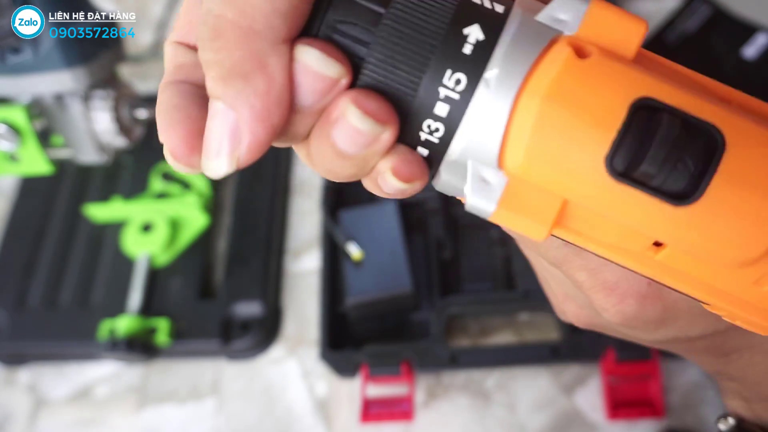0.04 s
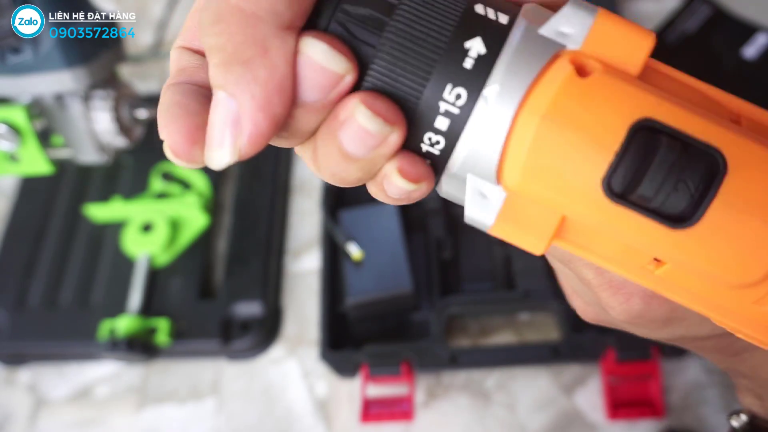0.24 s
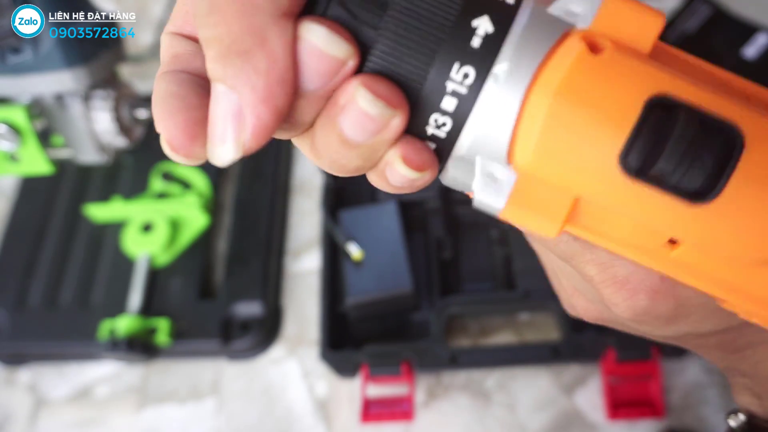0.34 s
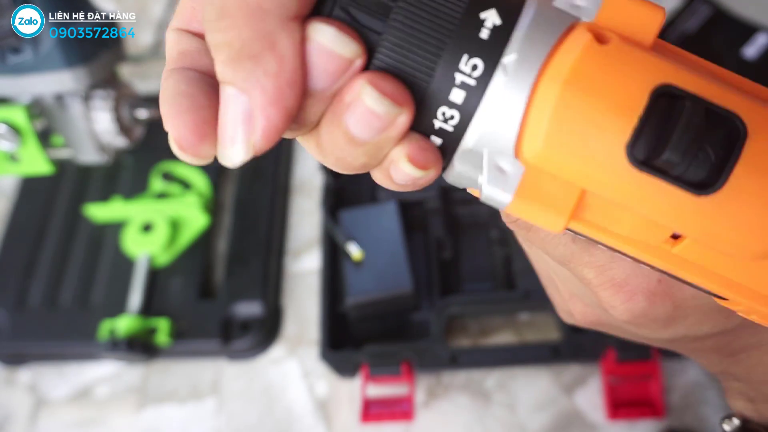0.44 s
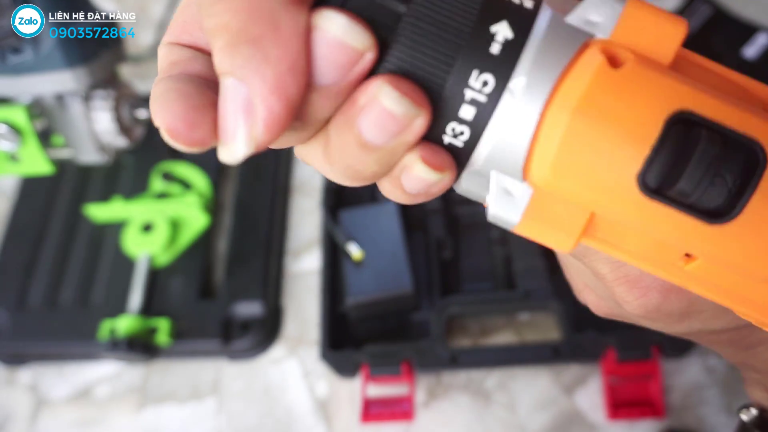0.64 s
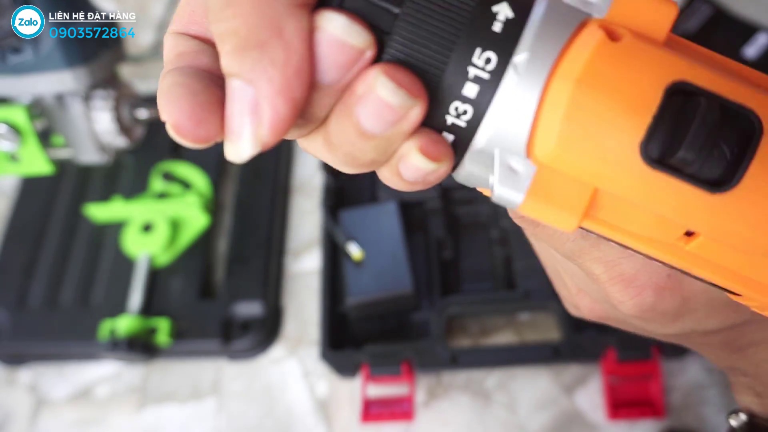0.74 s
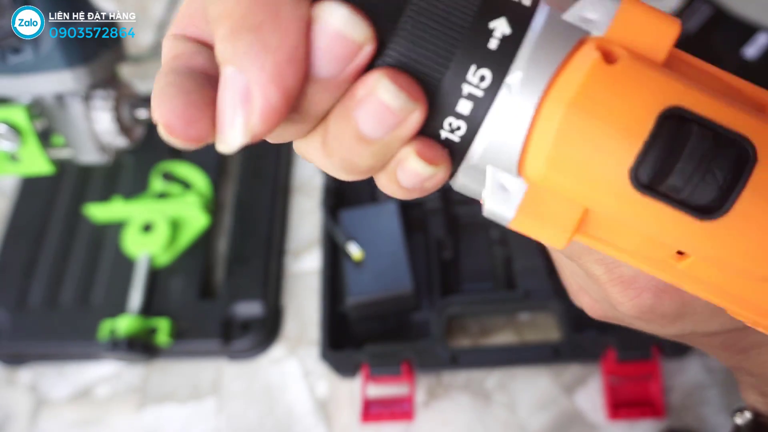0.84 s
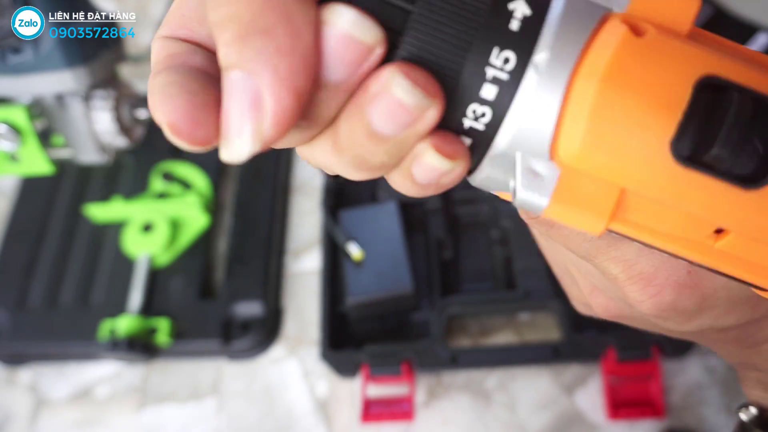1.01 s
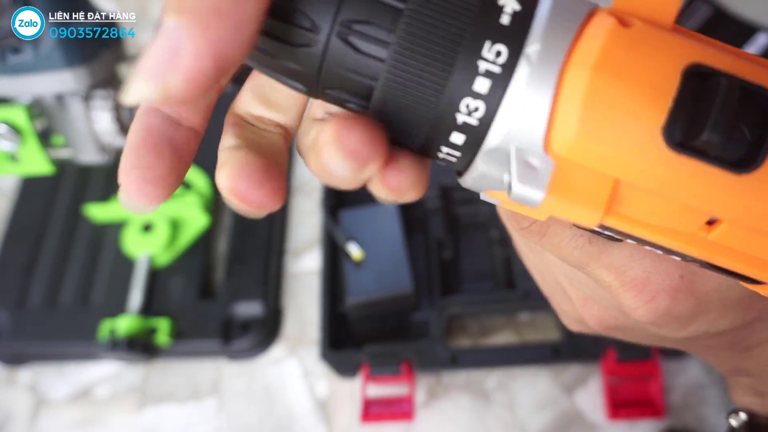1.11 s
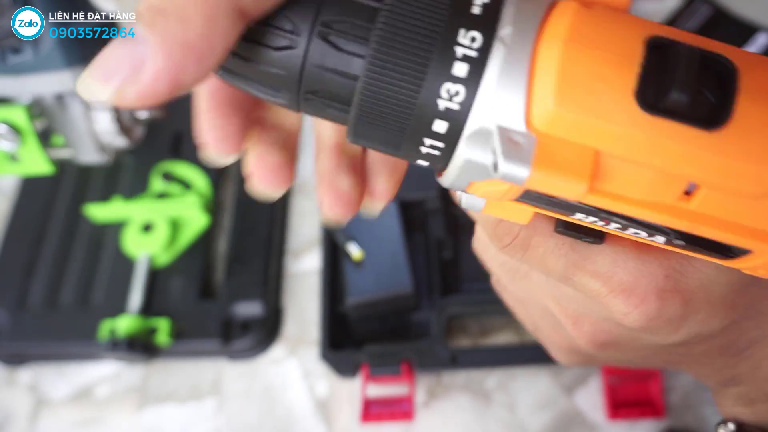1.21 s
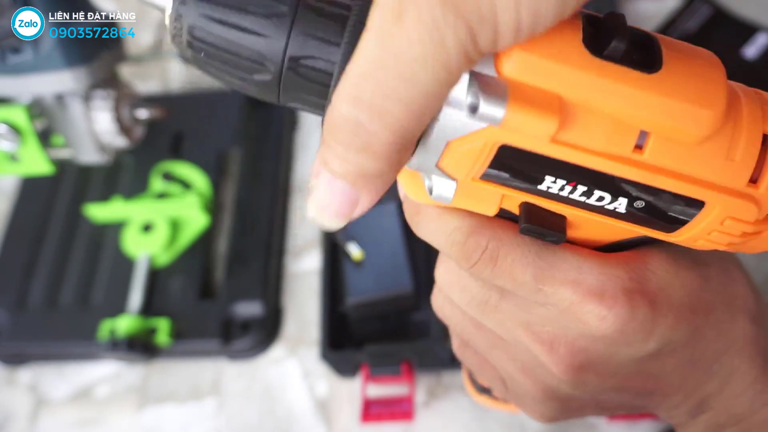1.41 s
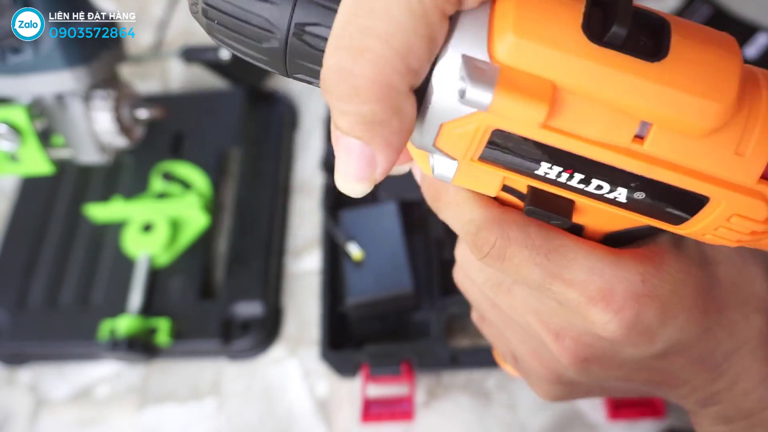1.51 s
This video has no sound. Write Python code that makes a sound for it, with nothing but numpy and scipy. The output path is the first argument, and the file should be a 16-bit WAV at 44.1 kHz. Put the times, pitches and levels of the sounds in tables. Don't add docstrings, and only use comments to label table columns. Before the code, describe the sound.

Cordless drill squeezed in short bursts, whining and ticking, with sharp clutch clicks close up indoors

```python
import sys
import numpy as np
from scipy import signal
from scipy.fft import rfft, irfft, next_fast_len
from scipy.io import wavfile
from scipy.ndimage import uniform_filter1d, map_coordinates

SR = 44100
rng = np.random.default_rng(int(sys.argv[2]) if len(sys.argv) > 2 else 0)


def nominal_scale(level):
    x = np.asarray(level, float) / 20
    return 10 ** x


def put_to_file(sound):
    columns = np.atleast_2d(sound).T
    safe = np.clip(columns, -1, 1)
    whole_steps = np.round(safe * 32767)
    wavfile.write(sys.argv[1], SR, whole_steps.astype(np.int16))


N = 68355

# frequency in Hz, level in dB per Hz.
AIR = [(25, -31), (130, -23), (330, -9.5), (570, -12.5), (1800, -21), (3000, -19), (4500, -25),
       (11300, -32)]
AIR_DB = -57.5
# centre in Hz, width in Hz, level in dB.
HUM = [(153.8, 8.6, -73.5), (393.7, 5.8, -62.5), (3000, 130, -70.5)]
# frequency in Hz, correlation.
ALIKE = [(60, 0.67), (300, 0.88), (840, 0.5), (3140, 0.11)]
# time in seconds, level in dB.
DUCK = [
    (0, 5.5),
    (.82, 5.5),
    (.95, 2),
    (1.3, -.5),
    (1.55, 2.5),
]
BASS_DUCKS = 1.73
# frequency in Hz, T60 in seconds.
ROOM = [(200, 0.52), (2000, 0.4), (10000, 0.24)]
ROOM_DB = -13.5

# frequency in Hz, left over right in dB.
DRILL_PAN = [(400, 1.5), (1420, -6.5), (4090, -7), (9000, -1)]
# frequency in Hz, scatter in rad.
SPREAD = [(500, 0.37), (3000, 0.59), (7000, 0.97)]
WHINE_PAN_DB, SNAP_PAN_DB = -7, 0.5

# time in seconds, level in dB.
SKIN_SLIDE = [
    (1.02, -64),
    (1.13, -68),
    (1.175, -68),
    (1.187, -60),
    (1.21, -67),
    (1.28, -70),
    (1.36, -82),
]
# frequency in Hz, level in dB per Hz.
SKIN = [(1200, -16), (2360, -4), (4060, -12.5), (10000, -11)]
# time in seconds, level in dB.
RUSTLE = [
    (1.22, -68),
    (1.28, -60),
    (1.295, -85),
    (1.41, -75),
    (1.42, -59.5),
    (1.45, -78),
    (1.5, -80),
    (1.515, -63.5),
    (1.55, -62),
]
# frequency in Hz, level in dB per Hz.
CLOTH = [(2500, -25), (5500, -3), (9000, 6), (11300, -6)]

# start in seconds, peak in dB, ring in Hz.
SNAPS = [(0.0205, -43, 9350), (0.04, -38, 7550), (0.0542, -30.5, 7900), (0.066, -42, 5500),
         (0.2176, -19, 6260), (0.3087, -31, 10600), (0.3187, -16.5, 4450), (0.3467, -27, 10000),
         (0.402, -43, 4440), (0.4326, -38, 8400), (.5335, -35, 7800), (0.6208, -29, 5300),
         (.627, -28, 10000), (0.6396, -16.5, 5520), (0.8722, -15.5, 10500), (1.0711, -36, 5980),
         (1.0928, -33.5, 4220), (1.1364, -44, 7700), (1.153, -38, 2450), (1.1602, -36.5, 9700),
         (1.166, -44, 9400), (1.184, -37.5, 2300), (1.1887, -38, 2110), (1.199, -41, 1980),
         (1.2064, -34.5, 10850), (1.5137, -48, 7400)]
# centre in Hz, width in Hz, level in dB.
SNAP_RING = [(4420, 4500, -7), (10140, 1500, -7)]
SNAP_T60, SNAP_DB = 0.0082, 3.5
SNAP_Q, SNAP_OWN_DB = 8, 4
SPIKE = 9

# time in seconds, level in dB.
EFFORT = [
    [(0, -47.5), (.012, -40.5), (.04, -45.5), (.06, -50), (.075, -61)],
    [(.196, -49.5), (.22, -37.5), (.27, -50.5), (.31, -39.5), (.335, -51), (.385, -48), (.4, -38),
     (.44, -55)],
    [(.529, -43.5), (.6, -44), (.685, -34.5), (.7, -41), (.735, -42), (.765, -60)],
    [(.828, -42.5), (.86, -42.5), (.875, -32), (.94, -30.5), (.975, -31.5), (1.0, -47), (1.04, -63)],
]
# frequency in Hz, level in dB per Hz.
GEARS = [(250, -35), (480, -21), (750, -3.5), (2400, -6), (4000, -11), (11300, -17)]
GEAR_DB, GRIT_DB = 1.5, 3
HISS_DB, HISS_GROWS = 10.5, 1.414
COAST_HZ, COAST_WIDTH_HZ, COAST_DB = 3200, 220, -1.5

# start in seconds, peak in dB, loudest housing ring in Hz.
COGS_COAST = [
    (0.0103, -28.5, 1370),
    (0.0163, -33, 1422),
    (0.0215, -31, 815),
    (0.0274, -34, 1140),
    (0.0324, -34, 1260),
    (0.0363, -42, 1360),
    (0.0429, -41, 1230),
    (0.0523, -33.5, 1510),
]
COGS_1 = [(0.1967, -32, 1710), (0.211, -37, 1260), (0.2188, -14.5, 1930), (0.2225, -24, 700),
          (0.226, -30, 1250), (0.231, -22.5, 1280), (0.238, -27, 1640), (0.247, -25.5, 1210),
          (0.255, -30, 1350), (0.2685, -27, 1570), (0.2865, -39, 2390), (0.301, -27.5, 1480),
          (0.3123, -28.5, 1730), (0.3205, -29.5, 1380), (0.327, -30, 1440), (0.3471, -29.5, 2360),
          (0.3533, -23, 1390), (0.3826, -32, 1520), (0.393, -30, 1410), (0.3984, -25.5, 1550),
          (0.403, -29.5, 1590)]
COGS_2 = [(0.5294, -44, 2000), (0.5353, -21.5, 850), (0.5458, -30, 990), (0.5536, -26.5, 1320),
          (0.5645, -27, 1350), (0.573, -25.5, 1510), (0.5848, -29, 1680), (0.6004, -24.5, 1350),
          (0.6099, -23, 2440), (0.6232, -20, 2530), (0.6339, -21, 2040), (0.6449, -16.5, 2200),
          (0.6525, -19.5, 2326), (0.6595, -29, 1420), (0.6664, -22, 1490), (0.6722, -24, 1300),
          (0.6772, -21.5, 1840), (0.683, -17, 1700), (0.6874, -22, 2270), (0.6908, -26.5, 1050),
          (0.6958, -24.5, 2050), (0.7052, -24.5, 1290), (0.7152, -23, 1100), (0.7254, -26, 1290)]
COGS_RUN_UP = [(0.8291, -28.5, 1540), (0.8414, -38, 1440), (0.8447, -32.5, 1070), (0.848, -28, 1670),
               (0.8539, -24, 1360), (0.8569, -31, 1440), (0.8593, -27.5, 1466), (0.8625, -21, 1280),
               (0.867, -18, 1920), (0.8708, -17, 1590), (0.8746, -14.5, 2130), (0.8782, -18.5, 2480),
               (0.8815, -20.5, 1579), (0.8834, -16.5, 1900), (0.886, -24, 1840), (0.8883, -24, 1510),
               (0.8903, -17, 1540), (0.8933, -31, 1860), (0.8976, -23, 2050), (0.9003, -17.5, 1770),
               (0.9039, -17.5, 1540)]
# centre in Hz, width in Hz, level in dB.
COG_BODY = [(744, 370, -5.5), (1479, 284, 1.5), (2050, 740, -3.5), (3280, 460, 5.5), (4500, 470, -2.5)]
COG_DB, COG_TOP_HZ = 1.5, 5330
COG_VARY, COG_COLOUR_DB = 0.076, 2.5
COG_RING_DB, COG_RING_Q, RUN_TOP_DB = 6.5, 4.4, -3

# time in seconds, cog rate in Hz, level in dB.
SPIN = [
    (.87, 330.1, -19),
    (.885, 480.6, -19),
    (.9, 598.1, -18.5),
    (.91, 715.7, -21),
    (.922, 820.3, -22.5),
    (.935, 882.6, -22),
    (.955, 890.4, -27),
    (.97, 710.6, -24),
    (.99, 339, -37.5),
]
# multiple of the cog rate, level in dB over the cogs.
MESH = [(1, -16), (3, -3), (5, -7)]
# frequency in Hz, level in dB.
MESH_BODY = [(1100, -24), (1600, -9), (2150, -1), (2450, -4), (2700, -14), (3900, -14), (4400, -2)]
SCATTER, COG_SIZE_DB = .3, 3.5

# start in seconds, pitch in Hz, level in dB.
WHINE_1 = [(.197, 3167, -30.5), (.207, 3183, -32), (0.22, 3200, -38), (0.237, 3137, -29.5),
           (0.244, 3290, -35), (.262, 3290, -34), (0.2748, 3029, -28), (.291, 3311, -33), (.354, 3030, -33),
           (.361, 3254, -36.5), (0.372, 3144, -37), (.383, 3165, -60)]
WHINE_2 = [(.530, 3168, -32), (0.552, 3290, -30.5), (.561, 3100, -29), (.566, 3312, -32.5),
           (.578, 3025, -26.5), (.585, 3315, -31), (.606, 2952, -26), (.617, 2995, -27),
           (.625, 2960, -25.5), (0.633, 3215, -29.5), (0.651, 2968, -30), (.682, 3230, -33.5),
           (0.704, 3160, -44)]
WHINE_3 = [(0.829, 3160, -31.5), (0.8438, 3290, -38), (0.8486, 3114, -30.5), (.852, 3280, -36),
           (0.8569, 3120, -28), (0.861, 3236, -37), (.865, 3075, -28), (0.870, 3320, -30),
           (0.879, 2948, -25.5), (0.886, 3290, -42), (0.893, 3180, -27), (.898, 2990, -60)]
OVERTONES_DB = (0, -16, -17.5)
WHINE_DB, WHINE_WOBBLE_DB, WHINE_JITTER_HZ = 1, 1.39, 12
# frequency in Hz, level in dB.
THIRD_GAIN = [(8800, -8), (9400, 2.5), (10000, -2.5)]

TOP_HZ, EDGE_HZ = 11200, 110
SIDES = np.array([[.5], [-.5]])


def unit(x):
    return x / np.sqrt(np.mean(x ** 2) + 1e-20)


def along(points, hz):
    f, v = np.transpose(points)
    return np.interp(np.log(hz + 1), np.log(f + 1), v)


def curve(rows, column=1, out=-120):
    r = np.asarray(rows, float)
    return np.interp(np.arange(N) / SR, r[:, 0], r[:, column], out, out)


def wobble(rate):
    knots = rng.standard_normal(int(N * rate / SR) + 4)
    return map_coordinates(knots, [np.arange(N) * rate / SR])


def filtered(x, response):
    m = next_fast_len(N + SR // 2)
    return irfft(rfft(x, m) * response(np.fft.rfftfreq(m, 1 / SR)), m)[..., :N]


def resonances(peaks):
    def response(f):
        total = 0
        for k, (c, w, db) in enumerate(peaks):
            total = total + (-1) ** k * nominal_scale(db) * 1j * f * w / (c * c - f * f + 1j * f * w)
        return total
    return response


def noise(spectrum):
    return unit(filtered(rng.standard_normal(N), lambda hz: nominal_scale(along(spectrum, hz))))


def hum(centre, width):
    return unit(filtered(rng.standard_normal(N), lambda f: 1 / (1 + ((f - centre) / width) ** 2)))


def effort():
    return np.max([curve(rows) for rows in EFFORT], axis=0)


def air():
    def angle(hz):
        return np.arccos(np.clip(along(ALIKE, hz), -1, 1)) / 2

    def mid_side(hz):
        return nominal_scale(along(AIR, hz)) * [np.cos(angle(hz)), np.sin(angle(hz))]
    mid, side = filtered(rng.standard_normal((2, N)), mid_side)
    bed = nominal_scale(AIR_DB + 1.27 * wobble(6.73)) * unit(np.array([mid + side, mid - side]))
    low, *hums = (nominal_scale(db) * hum(c, w) for c, w, db in HUM)
    bass = filtered(bed + low, lambda hz: 1 / (1 + (hz / 236.0) ** 4))
    rest = filtered(bed, lambda hz: 1 / (1 + (255.0 / (hz + 1)) ** 4))
    duck = curve(DUCK)
    return nominal_scale(duck) * rest + sum(hums) + nominal_scale(BASS_DUCKS * duck - 2.5) * bass


def room(x):
    hz, t, z = signal.stft(rng.standard_normal((2, SR // 2)), SR, nperseg=256)
    decay = nominal_scale(-60 * t / along(ROOM, hz)[:, None])
    tail = signal.istft(z * decay, SR, nperseg=256)[1]
    delayed = np.pad(x, (250, 0))[None]
    return signal.fftconvolve(delayed, tail / np.linalg.norm(tail[0]), axes=1)[:, :N]


def ports(x):
    knots = rng.standard_normal(64)

    def response(hz):
        phase = along(SPREAD, hz) * map_coordinates(knots, [hz / 400])
        low_cut = hz ** 4 / (hz ** 4 + 234.0 ** 4)
        return nominal_scale(along(DRILL_PAN, hz) * SIDES) * low_cut * np.exp(2j * SIDES * phase)
    return filtered(x, response)


def fingers():
    rustle_db = curve(RUSTLE) + 3.4 * np.array([wobble(150), wobble(150)])
    rustle = nominal_scale(rustle_db) * np.array([noise(CLOTH), noise(CLOTH)])
    slide_db = curve(SKIN_SLIDE) + 11 + 4.3 * np.array([wobble(140), wobble(120)])
    return rustle + nominal_scale(slide_db) * np.array([noise(SKIN), noise(SKIN)])


def snaps():
    out, t = np.zeros((2, N + SR)), np.arange(1000) / SR
    envelope = nominal_scale(-60 * t / SNAP_T60) * (1 - np.exp(-t / 0.00033))
    for s, db, hz in SNAPS:
        crack = np.zeros((2, N))
        same, own = rng.standard_normal(len(t)), rng.standard_normal((2, len(t)))
        crack[:, :len(t)] = (same + 2.5 * own) * envelope
        crack[:, 12] += SPIKE
        rings = SNAP_RING[:1] + [(hz, hz / SNAP_Q, SNAP_OWN_DB)] + SNAP_RING[1:]
        crack = filtered(crack, resonances(rings))[:, :len(t)]
        crack /= np.abs(crack.mean(axis=0)).max()
        out[:, round((s + .0006) * SR):][:, :len(t)] += nominal_scale(db + SNAP_DB + SIDES * SNAP_PAN_DB) * crack
    return out[:, :N]


def coast():
    return nominal_scale(COAST_DB + curve(EFFORT[0]) + 5.7 * wobble(250)) * hum(COAST_HZ, COAST_WIDTH_HZ)


def gears():
    db = effort()
    top = db.max()
    low = filtered(noise(GEARS), lambda hz: 1 / (1 + (hz / 4000) ** 4))
    high = filtered(np.array([noise(GEARS), noise(GEARS)]), lambda hz: 1 / (1 + (4000 / (hz + 1)) ** 4))
    grit = nominal_scale(GEAR_DB + db + GRIT_DB * wobble(700)) * low
    hiss = nominal_scale(HISS_DB + top + HISS_GROWS * (db - top) + 2.36 * wobble(500)) * high
    return coast() + grit + hiss


def kick(body):
    def response(f):
        return resonances(body)(f) / (1 + 1j * f / COG_TOP_HZ) ** 2
    tap = filtered(np.eye(1, N)[0], response)[:800]
    return tap / np.abs(tap).max()


def slow_cogs():
    out = np.zeros(N + SR)
    for s, db, hz in [*COGS_COAST, *COGS_1, *COGS_2, *COGS_RUN_UP]:
        body = []
        for c, w, g in COG_BODY:
            centre = c * np.exp(COG_VARY * rng.standard_normal())
            body.append((centre, w, g + COG_COLOUR_DB * rng.standard_normal()))
        nearest = np.argmin([abs(np.log(c / hz)) for c, _, _ in body[:3]])
        body[nearest] = (hz, hz / COG_RING_Q, COG_RING_DB)
        out[round((s - .0003) * SR):][:800] += nominal_scale(db) * kick(body)
    return nominal_scale(COG_DB) * out[:N]


def whirr():
    rate = curve(SPIN, column=1, out=0)
    turn = np.cumsum(rate) / SR
    level = nominal_scale(curve(SPIN, column=2))
    uneven = turn + SCATTER * wobble(600).clip(-1.5, 1.5)
    at = np.flatnonzero(np.diff(np.floor(uneven)) > 0)
    at = at[at > (COGS_RUN_UP[-1][0] + .001) * SR]
    kicks = np.zeros(N)
    kicks[at] += level[at] * nominal_scale(COG_SIZE_DB * rng.standard_normal(N)[at])
    one = kick([(c, w, g + RUN_TOP_DB * (c > 3000)) for c, w, g in COG_BODY])
    mesh = np.zeros(N)
    for k, db in MESH:
        gain = nominal_scale(db + along(MESH_BODY, k * rate) + 4.2 * wobble(150))
        mesh += gain * np.sin(2 * np.pi * k * turn)
    return signal.fftconvolve(kicks, one)[:N] + level * mesh


def whine():
    hz, db = np.full(N, 3100.), np.full(N, -120.)
    for steps in (WHINE_1, WHINE_2, WHINE_3):
        for (s, f, level), (end, _, _) in zip(steps, steps[1:]):
            step = slice(round(s * SR), round(end * SR))
            hz[step], db[step] = f, level
    pitch = uniform_filter1d(hz, size=20) + WHINE_JITTER_HZ * wobble(500)
    phase = 2 * np.pi * np.cumsum(pitch) / SR
    gain = uniform_filter1d(nominal_scale(db + WHINE_DB), size=40) * np.sqrt(2)
    shake = np.clip((effort() + 48) / 10, 0, 1)
    gain = gain * nominal_scale((-1 - 5 * shake) * np.abs(wobble(250)))
    tone = np.zeros(N)
    for k, partial_db in enumerate(OVERTONES_DB):
        shell_db = (k == 2) * along(THIRD_GAIN, 3 * hz)
        partial = nominal_scale(partial_db + shell_db + WHINE_WOBBLE_DB * (1 + k) * wobble(110.1))
        tone += partial * np.sin((k + 1) * phase)
    return gain * tone


def scene():
    drill = ports(slow_cogs() + whirr() + gears()) + whine() * nominal_scale(WHINE_PAN_DB * SIDES)
    near = drill + snaps() + fingers()
    return near + nominal_scale(ROOM_DB) * room(near.mean(axis=0)) + air()


def low_pass(x):
    return signal.sosfilt(signal.butter(12, 12360, fs=SR, output="sos"), x)


def record(dry):
    def response(hz):
        return 0.0073 + 1 / (1 + np.exp(np.clip((hz - TOP_HZ) / EDGE_HZ * 2, -50, 50)))
    mix = filtered(dry, response)
    return low_pass(mix)


dry = scene()
out = record(dry)
put_to_file(out)
```